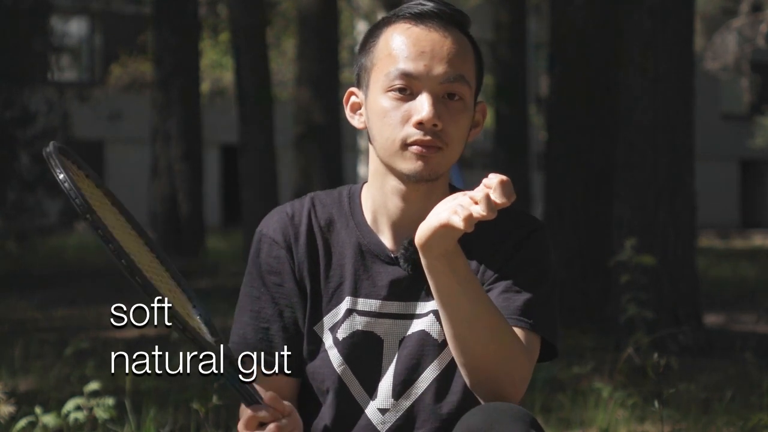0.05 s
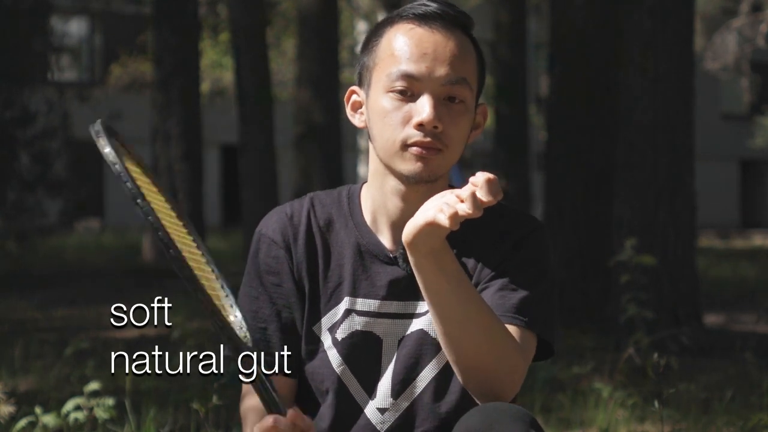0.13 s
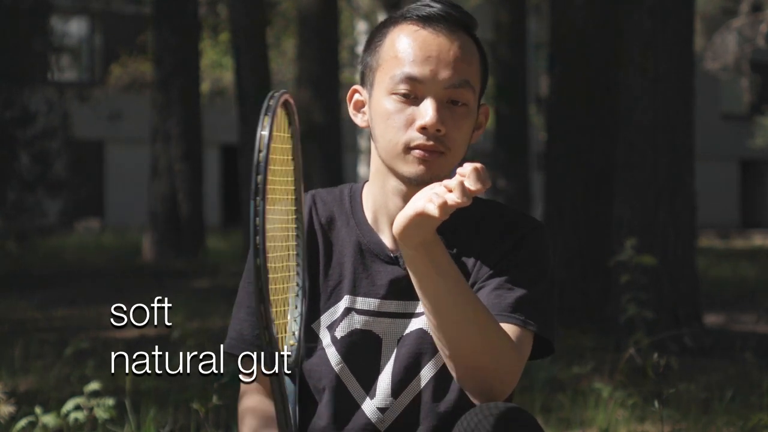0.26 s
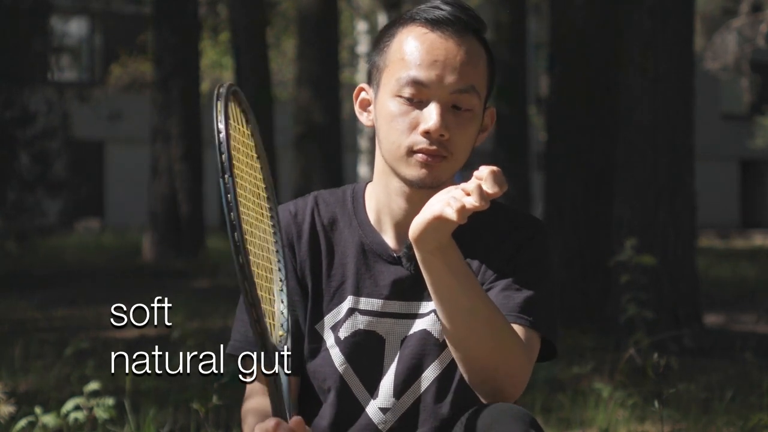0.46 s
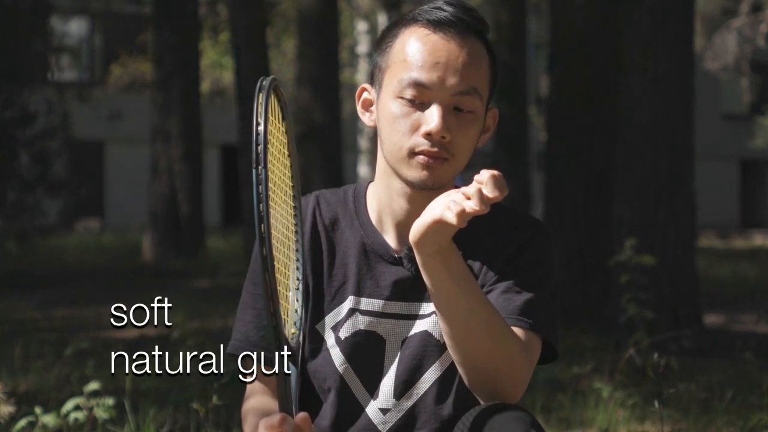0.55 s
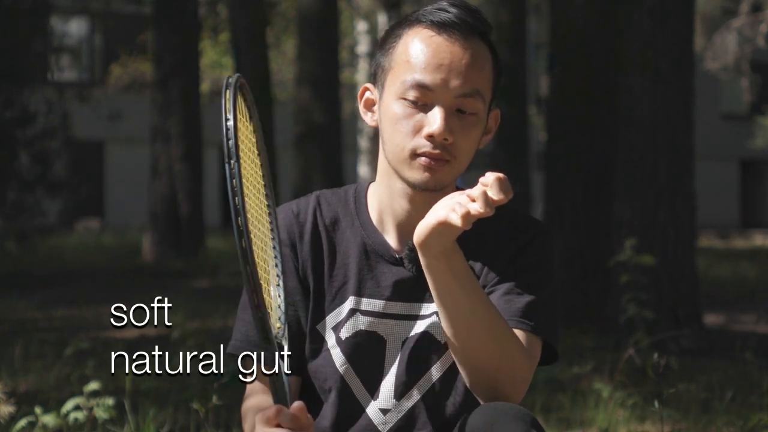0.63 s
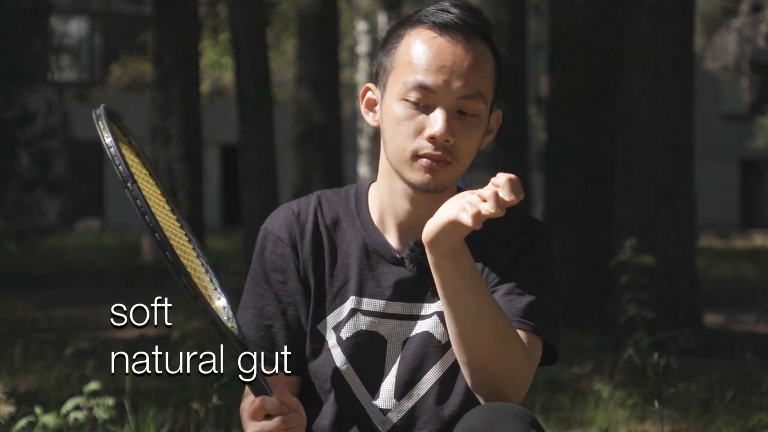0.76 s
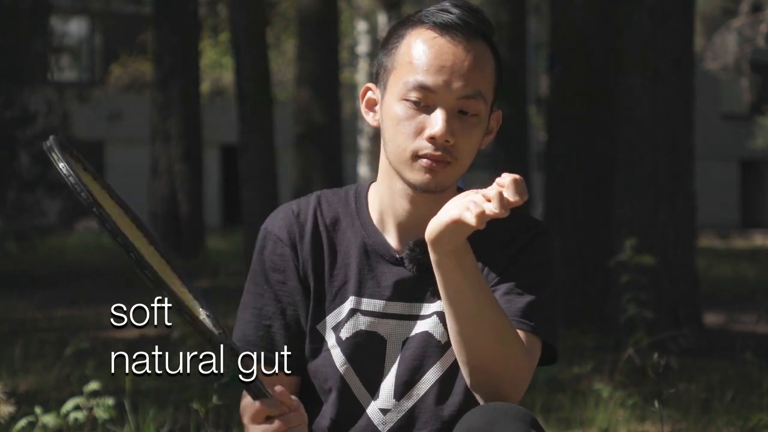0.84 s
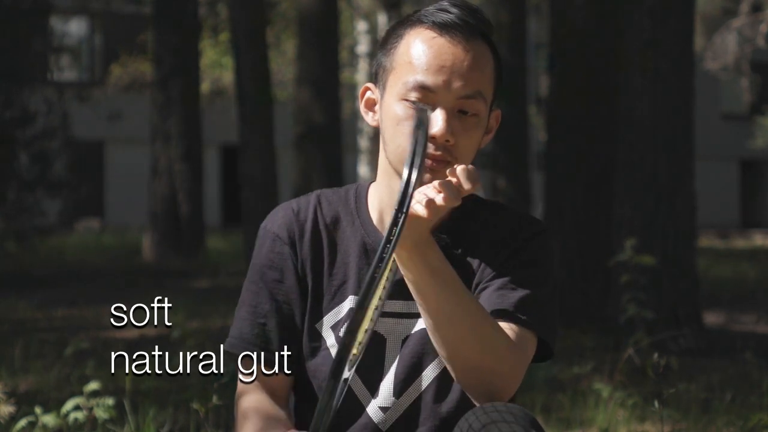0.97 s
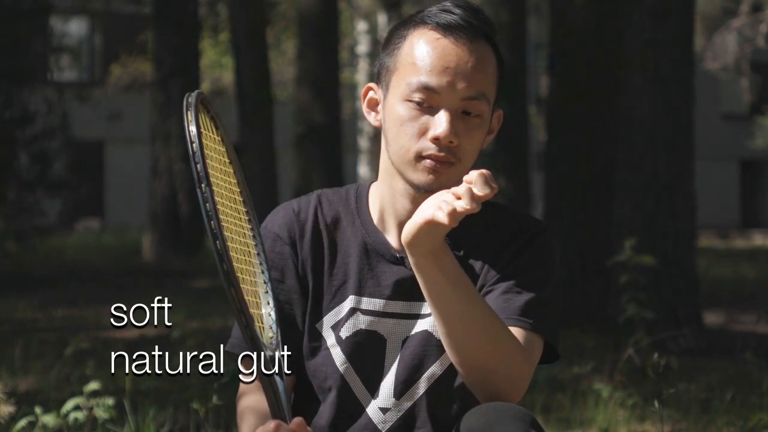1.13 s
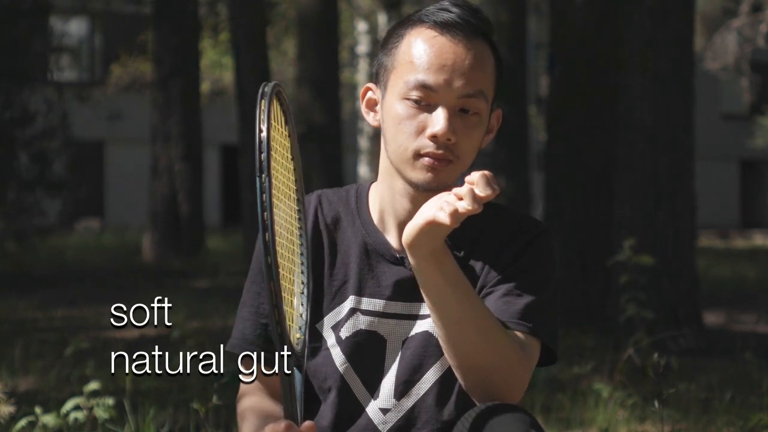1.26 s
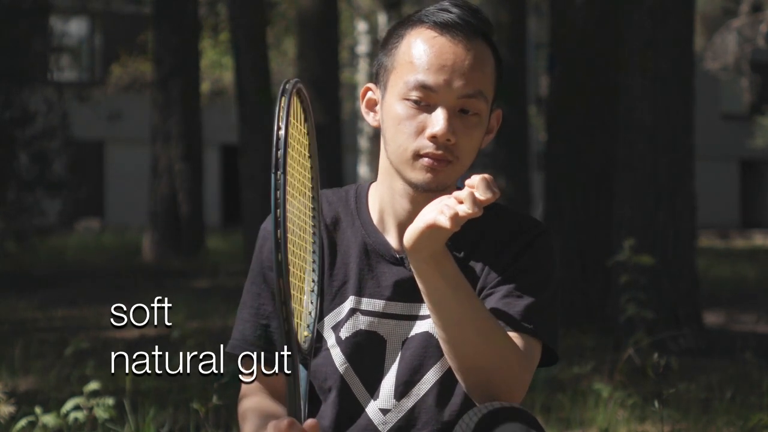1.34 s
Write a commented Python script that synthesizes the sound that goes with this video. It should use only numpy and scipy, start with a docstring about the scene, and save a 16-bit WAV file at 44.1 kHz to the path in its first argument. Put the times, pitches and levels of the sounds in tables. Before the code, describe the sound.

Two sharp, pinging knocks of racket strings on a hand, with birds chirping among trees.

```python
"""Outdoors among trees: a faint distant rumble, a far bird whistling and a nearer one twittering.
At 0.24 s a gut-strung racket knocks against the heel of a hand: the strings crack brightly, spring
back into a short pitched ring, the frame gives a low wobble and the wood echoes. At 1 s a second
knock lands on another spot and rings in a different colour. Just after it the nearer bird breaks
into a louder run of chirps, scattered back by the trunks."""
import sys
import numpy as np
from scipy import signal
from scipy.fft import rfft, irfft
from scipy.io import wavfile

SR = 44100
rng = np.random.default_rng(int(sys.argv[2]) if len(sys.argv) > 2 else 0)


def dump_mix(stems):
    """Bounce the given channels to the path in sys.argv[1] as a 16-bit WAV at rate SR."""
    frames = np.atleast_2d(stems).T  # one column per channel
    limited = np.clip(frames, -1, 1)  # hard clip at full scale
    pcm = np.round(limited * 32767).astype(np.int16)
    wavfile.write(sys.argv[1], SR, pcm)


N = 61739
T = np.arange(N) / SR
RING_ATTACK_S, ECHO_ATTACK_S = .0012, .02


def from_db(db):
    """Decibels to gain."""
    return 10 ** (np.asarray(db) / 20)


def noise(spectrum):
    """Noise at rms 1, coloured by rows of (frequency [Hz], relative level [dB])."""
    hz, db = np.transpose(spectrum)
    bins_hz = np.maximum(np.arange(N // 2 + 1) * SR / N, 1)
    gain = from_db(np.interp(np.log(bins_hz), np.log(hz), db))
    x = irfft(rfft(rng.standard_normal(N)) * gain, N)
    return x / x.std()


def drift(rate_hz):
    """Smooth random modulation with spread 1, rolling off above rate_hz."""
    pole = np.exp(-2 * np.pi * rate_hz / SR)
    x = signal.lfilter([1], [1, -2 * pole, pole * pole], rng.standard_normal(2 * N))[N:]
    return x / x.std()


def strike(start, attack, t60, hold=0):
    """Percussive envelope: straight rise, hold, exponential decay; all times in seconds."""
    age = T - start
    rise = np.clip(age / attack, 0, 1)
    return rise * np.exp(-np.log(1000) * np.maximum(age - attack - hold, 0) / t60)


def mode(start, hz, t60, db, attack):
    """One struck resonance: a decaying sine."""
    return from_db(db) * strike(start, attack, t60) * np.sin(2 * np.pi * hz * (T - start))


def air():
    """Distant rumble and soft outdoor hush, gently wavering in level."""
    # Colour of the ambience: (frequency [Hz], relative level [dB])
    colour = [(20, -24), (35, -12), (55, 2), (100, -6), (180, -17.5), (300, -23), (500, -24), (950, -15.5),
              (1400, -19.5), (2200, -33), (3900, -37.5), (8000, -36.5), (15000, -42), (16500, -36.5)]
    level_db = -46 - 1.5 * drift(rate_hz=15)
    return from_db(level_db) * noise(colour)


def song(notes, waver):
    """Tones that swell and fade as their pitch bends in an arc; waver is a share of the pitch."""
    out = np.zeros(N)
    wobble = 1 + waver * drift(rate_hz=350)
    for start, length, start_hz, middle_hz, end_hz, db in notes:
        u = np.clip(2 * (T - start) / length - 1, -1, 1)  # -1 to 1 across the note
        slope_hz = (end_hz - start_hz) / 2
        bend_hz = (start_hz + end_hz) / 2 - middle_hz
        hz = middle_hz + u * slope_hz + u ** 2 * bend_hz
        swell = np.sqrt(1 - u ** 2)
        out += from_db(db) * swell * np.sin(2 * np.pi * np.cumsum(hz * wobble) / SR)
    return out


def wood(x):
    """Diffuse reverb scattered back by the trunks."""
    tail = rng.standard_normal(N) * strike(.0049, ECHO_ATTACK_S, t60=.73)
    return signal.fftconvolve(x, tail / np.sqrt(np.sum(tail ** 2)))[:N]


def bird(notes, waver, blur, echo_db):
    """The direct, fluttering song and its echo, a wash that is blurred in pitch."""
    direct = song(notes, waver)
    flutter_db = 2.5 * drift(rate_hz=90)
    echo = wood(song(notes, blur))
    return from_db(flutter_db) * direct + from_db(echo_db) * echo


def far_bird():
    """Soft, gliding whistles around 3 kHz, deep in reverb."""
    # Whistles: (time [s], length [s], start pitch [Hz], middle pitch [Hz], end pitch [Hz], level [dB])
    whistles = [(-.04, .08, 3240, 3270, 2930, -53.5), (.065, .06, 3300, 3540, 3780, -51),
                (.175, 0.056, 3115, 3240, 2910, -50.5), (.25, 0.089, 3184, 3470, 3620, -52),
                (.355, 0.047, 2957, 3270, 3050, -48.5), (.44, 0.085, 3110, 3310, 3050, -55),
                (.525, 0.061, 3150, 3030, 3070, -57), (.56, 0.049, 2640, 2480, 2380, -64),
                (.613, 0.08, 2685, 3320, 3020, -50.5), (.748, .065, 2890, 3350, 3060, -58.5),
                (.803, 0.073, 2680, 3258, 2690, -51.5), (.945, 0.15, 3200, 3290, 3220, -53.5)]
    return bird(whistles, waver=.008, blur=.02, echo_db=-3.5)


def near_bird():
    """Quick, high twitter, drier than the far bird."""
    # Chirps: (time [s], length [s], start pitch [Hz], middle pitch [Hz], end pitch [Hz], level [dB])
    chirps = [(.008, 0.028, 4200, 3950, 4050, -52.5), (.028, 0.044, 4300, 4360, 4210, -50.5),
              (.42, 0.028, 4600, 4690, 4940, -58), (1.042, 0.029, 4600, 5490, 4800, -32.5),
              (1.043, 0.023, 3900, 4900, 4700, -32.5), (1.065, 0.022, 4780, 4660, 4790, -28.5),
              (1.094, 0.0075, 4700, 4470, 4250, -32.5), (1.105, 0.02, 4600, 4800, 5000, -54),
              (1.117, 0.018, 5200, 5260, 5270, -31), (1.132, 0.016, 5200, 5810, 5980, -35.5),
              (1.146, 0.01, 5550, 5370, 4830, -31.5), (1.156, 0.027, 3600, 4670, 4060, -36),
              (1.164, .016, 4880, 5320, 5700, -46), (1.182, 0.011, 5650, 5340, 4700, -35),
              (1.174, 0.034, 3450, 3700, 5200, -44.5), (1.212, 0.0091, 5970, 5060, 4670, -40),
              (1.293, .022, 3700, 3550, 3150, -45), (1.32, .034, 3150, 3900, 4500, -44),
              (1.352, .009, 4500, 5100, 6000, -45), (1.369, 0.022, 6500, 5680, 4800, -45.5)]
    return bird(chirps, waver=.011, blur=.036, echo_db=-6)


def lead_in_hiss(hit):
    """A faint hiss swells just ahead of the blow and stops on impact."""
    # Colour of the hiss: (frequency [Hz], relative level [dB])
    colour = [(200, -20.5), (2500, -18.5), (5000, 0), (8000, -1.5), (11000, -5), (16000, -17.5)]
    peak_db, rise_db_per_s = -49, 147
    return from_db(peak_db - rise_db_per_s * np.abs(hit - T)) * (T < hit) * noise(colour)


def string_crack(hit, blow, db, t60):
    """The strings crack against the hand and tick again as they leave it."""
    # Crack colour: (frequency [Hz], relative level in blow 1 [dB], relative level in blow 2 [dB])
    colours = [(200, -32, -27), (544, -12.5, -35), (1100, 5, -3), (1500, -9, -32), (1900, -3, -5),
               (2360, -11, -10.5), (3200, 1.5, 1), (3900, -13, -3.5), (4800, 1.5, -3.5), (6350, -10.5, 1.5),
               (7500, 2.5, 5.5), (9900, -6, 1), (10720, -3.5, -4.5), (12920, -13, -4), (16400, -19.5, -23)]
    colour = [(hz, levels_db[blow]) for hz, *levels_db in colours]
    touch = strike(hit, attack=.0014, t60=t60, hold=.0011)
    tick = from_db(-19.5) * strike(hit + .009, attack=.0014, t60=.011)
    return from_db(db) * (touch + tick) * noise(colour)


def frame_wobble(hit):
    """The frame bends under the blow and gives the knock its low end."""
    # Bending modes of the frame: (frequency [Hz], t60 [s], level [dB], delay [s])
    bends = [(61.3, 0.1, -14, 0.0109), (101.8, 0.066, -11.5, 0.0001), (178, 0.012, -36.5, 0.00076)]
    return sum(mode(hit + delay, hz, t60, db, attack=.004) for hz, t60, db, delay in bends)


def string_ring(release, blow):
    """The pitched ring of the strings; where the hand lands sets the balance of the bed's modes."""
    # String bed modes: (frequency [Hz], t60 [s], level in blow 1 [dB], level in blow 2 [dB])
    bed_modes = [ (599, .16, -27, -25), (820, .072, -8.3, -9.3), (1057, .1, -25, -23),
                 (1668, .055, -21, -15), (684, 0.22, -50, -34), (908, 0.04, -14.5, -17),
                 (1368, 0.18, -44.5, -39), (1853, 0.134, -32, -30), (2095, 0.21, -39.5, -31),
                 (2190, 0.17, -33, -38), (2800, 0.17, -38, -32.5), (3343, 0.12, -33.5, -41),
                 (4380, 0.033, -22.5, -36), (4760, 0.017, -16, -31), (5440, 0.017, -16, -46),
                 (6080, 0.077, -40, -26.5), (7410, 0.017, -25, -8.5), (9070, .035, -25, -24),
                 (10900, 0.022, -22, -38)]
    # Long, faint rings of single strings: (frequency [Hz], t60 [s], level [dB])
    long_rings = [(602, .6, -47), (942, 1.0, -46.5), (1254, .6, -51), (1384, .7, -49), (1755, 0.65, -44.5),
                  (2127, 0.57, -52), (2568, .6, -61.5)]
    bed = sum(mode(release, hz, t60, levels_db[blow], RING_ATTACK_S) for hz, t60, *levels_db in bed_modes)
    singles = sum(mode(release, hz, t60, db, RING_ATTACK_S) for hz, t60, db in long_rings)
    radiation = signal.butter(3, 480, "high", fs=SR, output="sos")  # thin strings radiate little bass
    return signal.sosfilt(radiation, bed + singles)


def after_ring(release, db):
    """Dense, weak rings of the string bed blend into a short noisy tail."""
    # Colour of the dense rings: (frequency [Hz], relative level [dB])
    colour = [(200, -15), (500, -11.5), (1000, 1), (1500, -10.5), (2400, -2), (3200, 3.5), (5000, 8),
              (6600, -1), (8800, 1), (11000, -19.5), (16000, -20.5)]
    return from_db(db) * strike(release, RING_ATTACK_S, t60=.14) * noise(colour)


def tree_echo(release):
    """The trees answer the knock with a soft, fading wash of noise."""
    # Colour of the echo: (frequency [Hz], relative level [dB])
    colour = [(200, -25), (1000, 5.5), (2500, -1), (5000, -2.5), (9000, -2.5), (12000, -7.5), (16000, -17)]
    return from_db(-44) * strike(release, ECHO_ATTACK_S, t60=.63) * noise(colour)


def racket():
    """Two knocks on the heel of a hand, each layered from lead-in to echo."""
    # Blows: (time [s], crack level [dB], crack t60 [s], after-ring level [dB])
    blows = [(.2352, -6.5, 0.016, -33), (1.0005, -9.5, 0.024, -23.5)]
    out = np.zeros(N)
    for blow, (hit, crack_db, crack_t60, after_db) in enumerate(blows):
        release = hit + .0024  # the strings ring once they spring back
        out += lead_in_hiss(hit)
        out += string_crack(hit, blow, crack_db, crack_t60) + frame_wobble(hit)
        out += string_ring(release, blow) + after_ring(release, after_db)
        out += tree_echo(release)
    return out


def scene():
    """Mono mix: racket close by, birds and air behind."""
    return (far_bird() + near_bird() + racket() + air())[None]


def record(dry):
    """Soft saturation rounds the peaks, then the deepest bass and the very top are cut."""
    ceiling, low_cut_hz, high_cut_hz = 1.3, 29, 15800
    low_cut = signal.butter(4, low_cut_hz, "high", fs=SR, output="sos")
    high_cut = signal.ellip(10, .1, 90, high_cut_hz, fs=SR, output="sos")
    rounded = ceiling * np.tanh(dry / ceiling)
    return signal.sosfilt(high_cut, signal.sosfilt(low_cut, rounded))


dry = scene()
out = record(dry)
dump_mix(out)
```